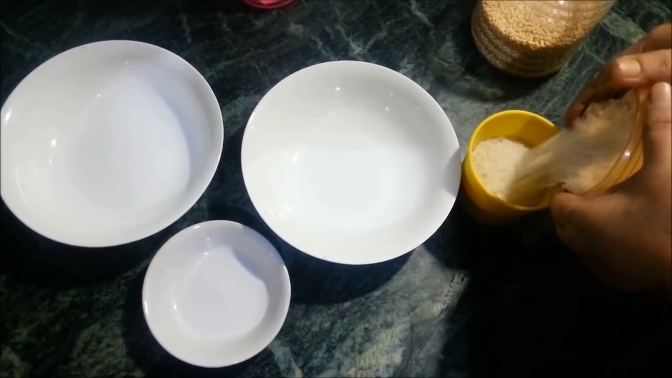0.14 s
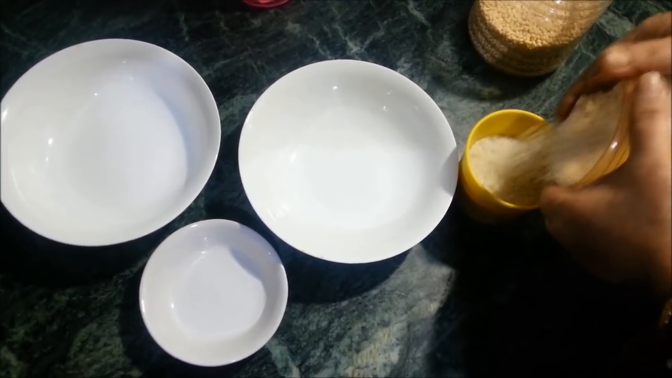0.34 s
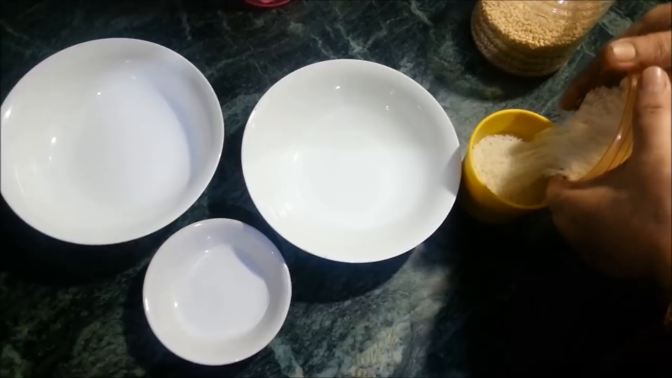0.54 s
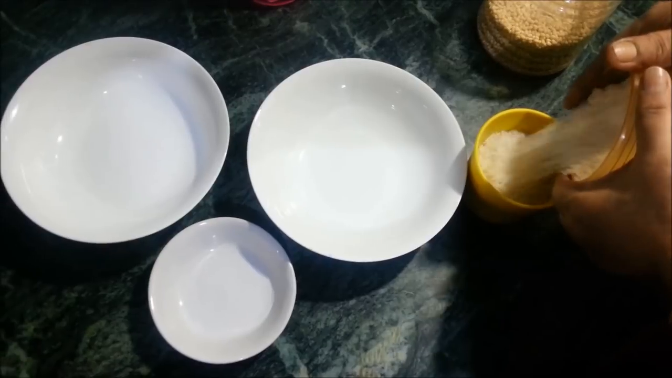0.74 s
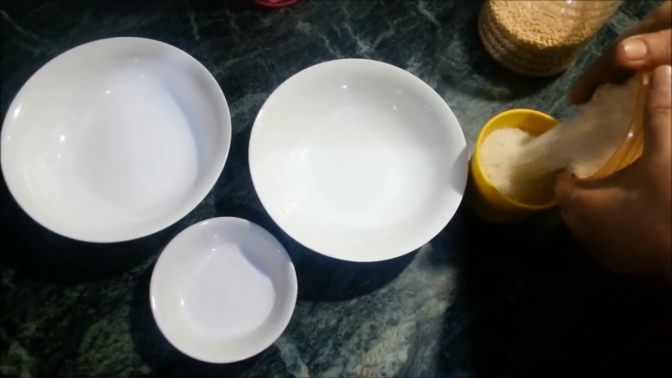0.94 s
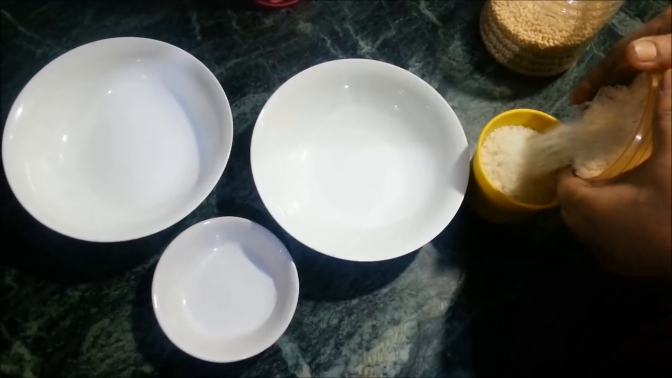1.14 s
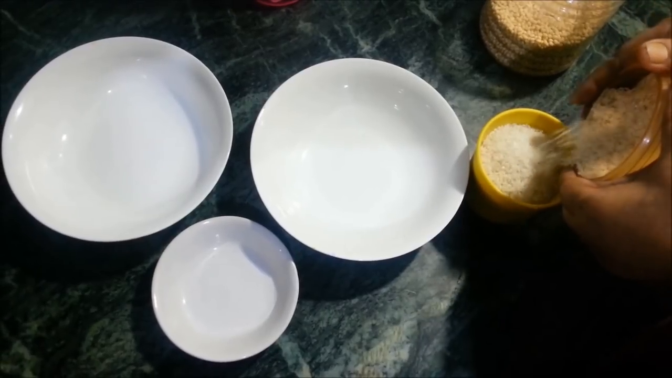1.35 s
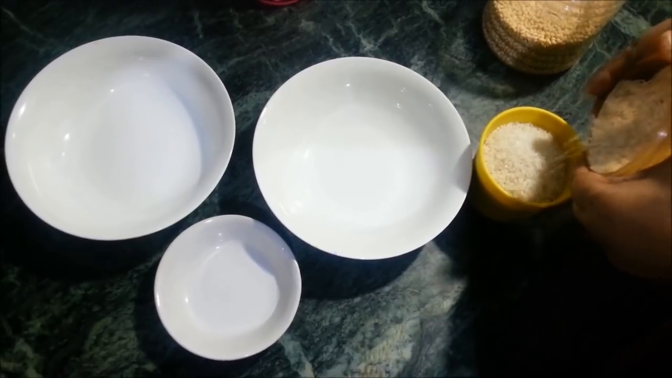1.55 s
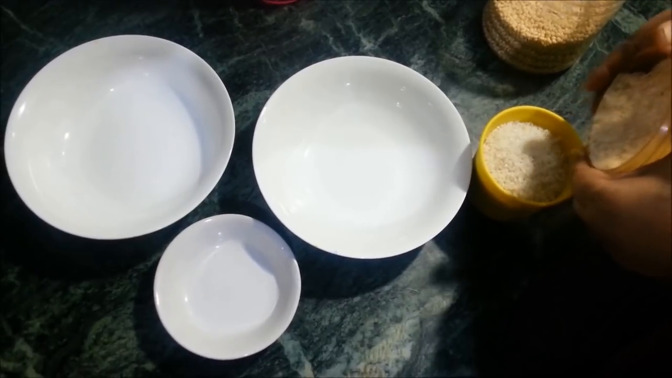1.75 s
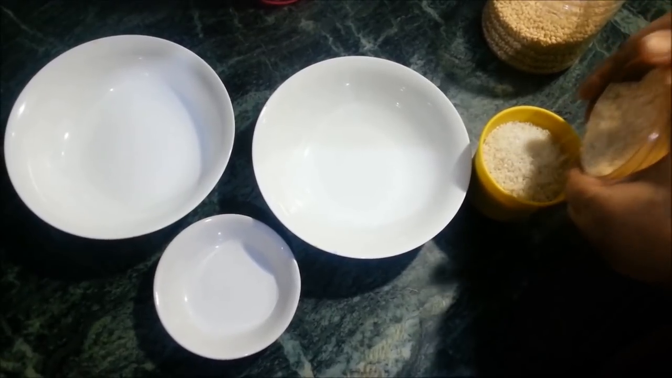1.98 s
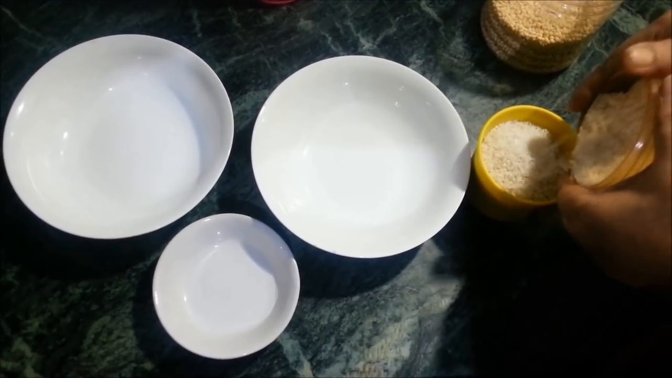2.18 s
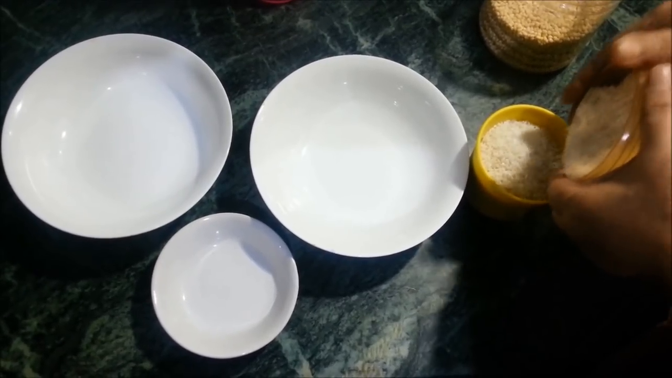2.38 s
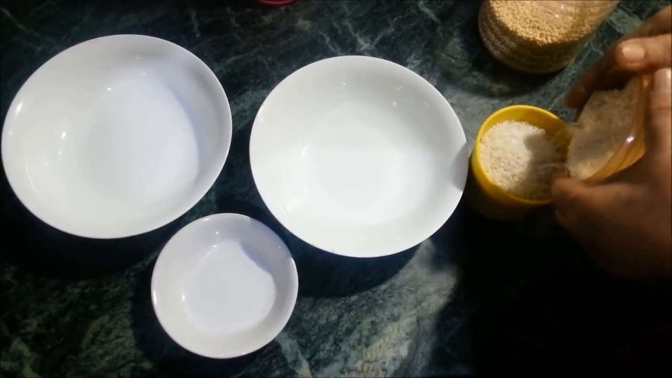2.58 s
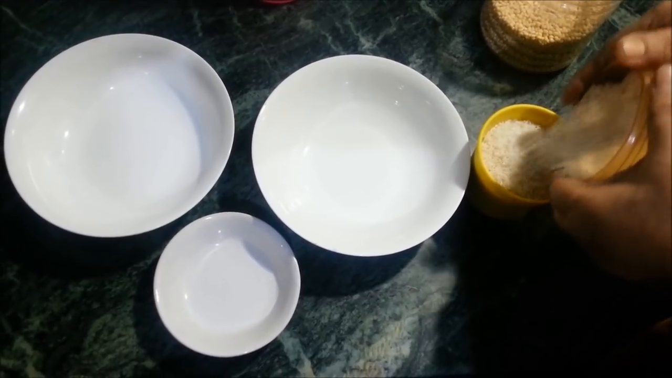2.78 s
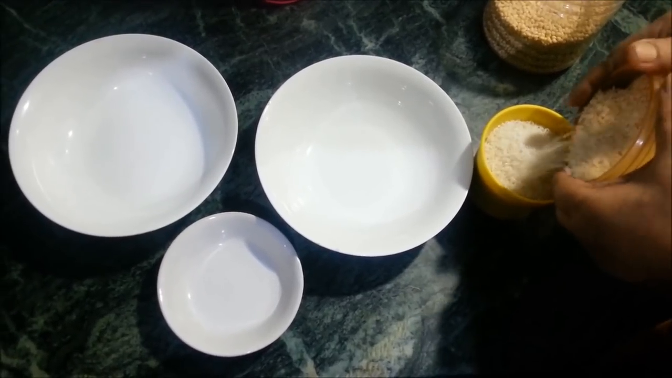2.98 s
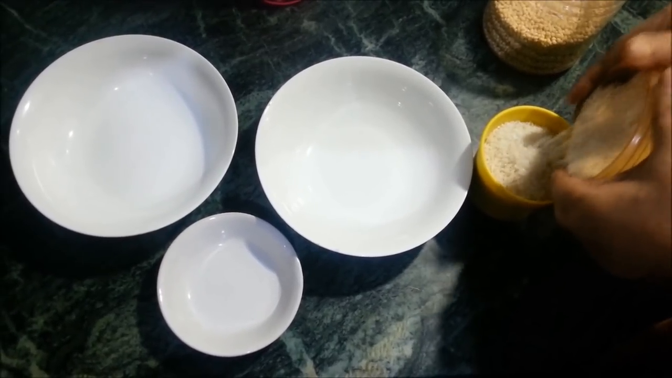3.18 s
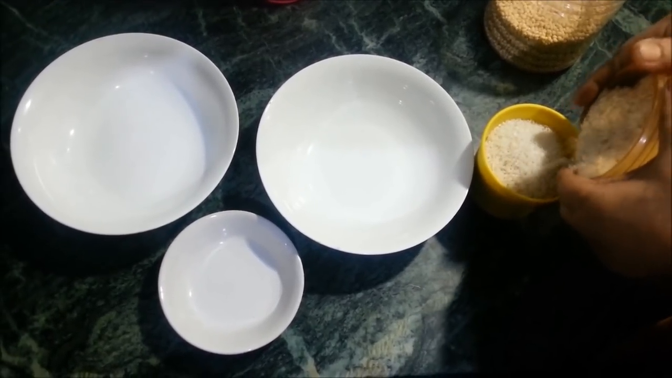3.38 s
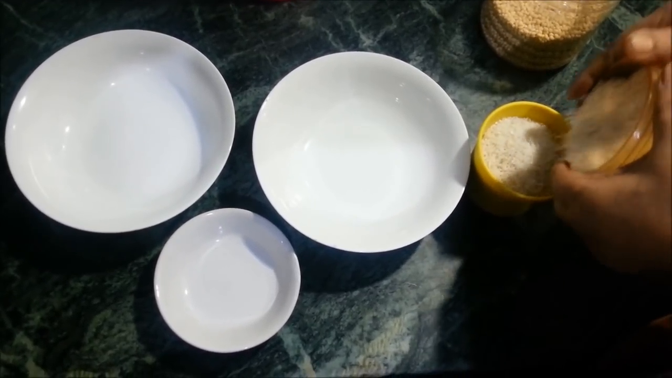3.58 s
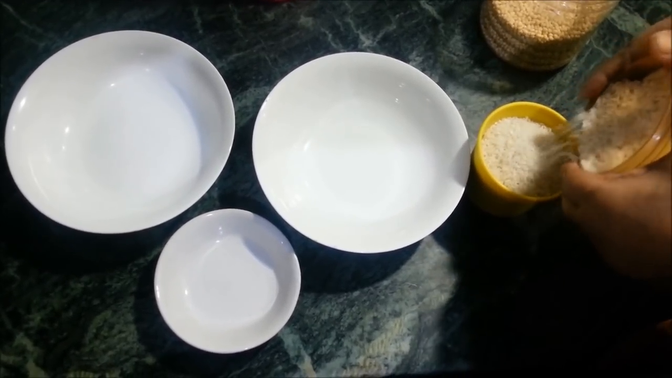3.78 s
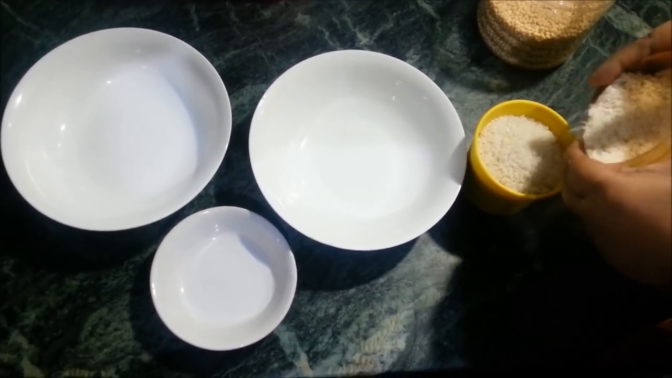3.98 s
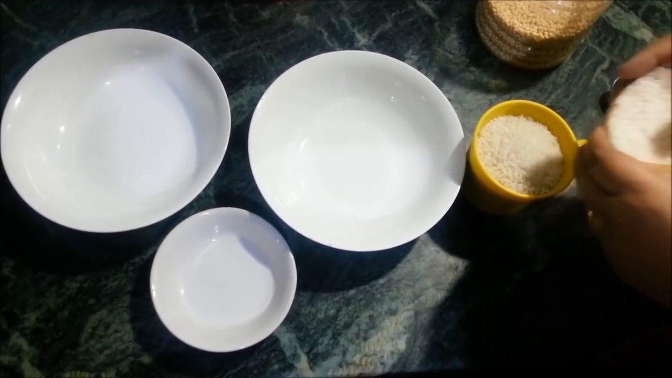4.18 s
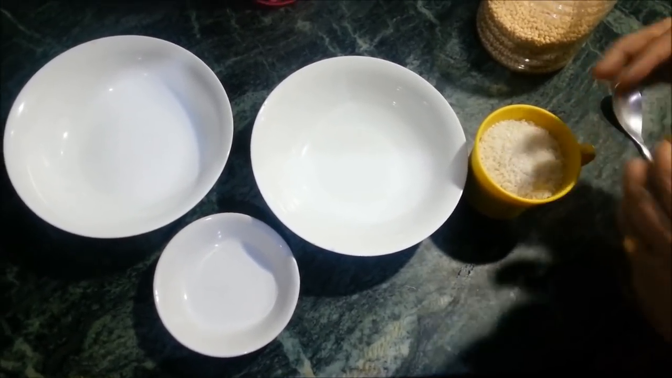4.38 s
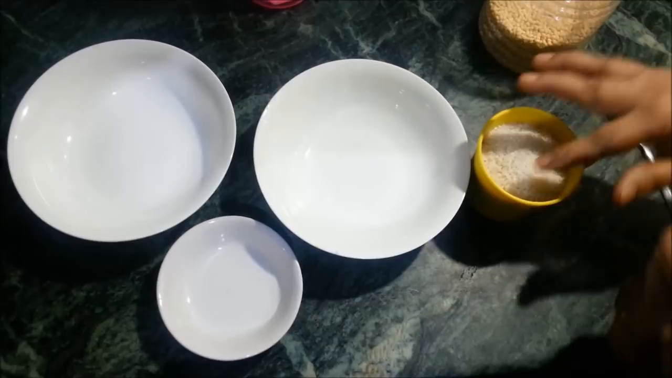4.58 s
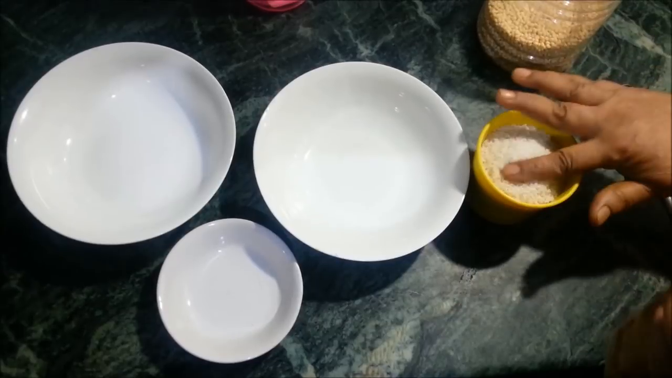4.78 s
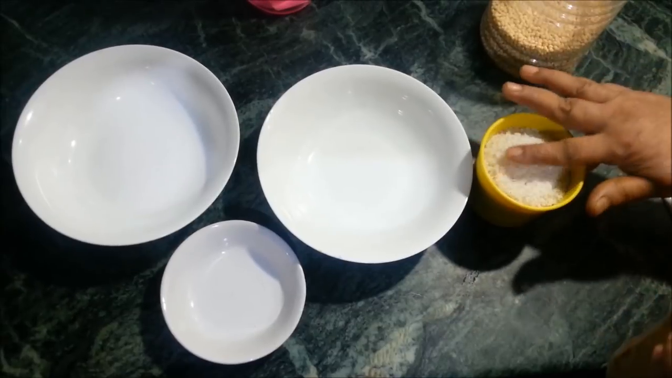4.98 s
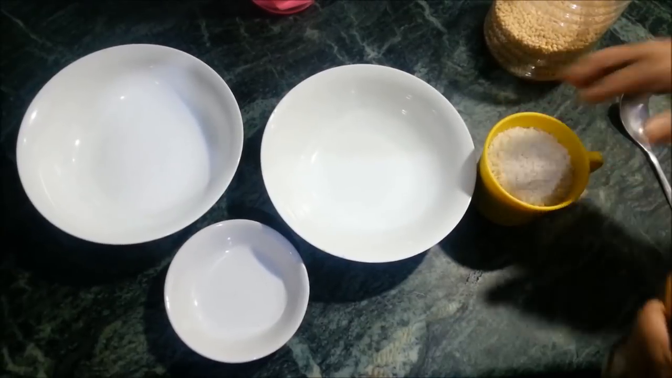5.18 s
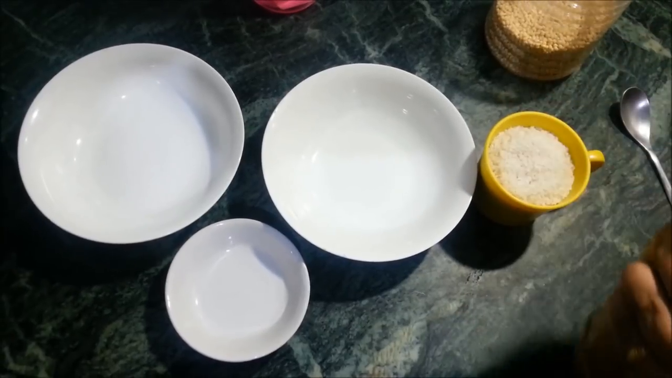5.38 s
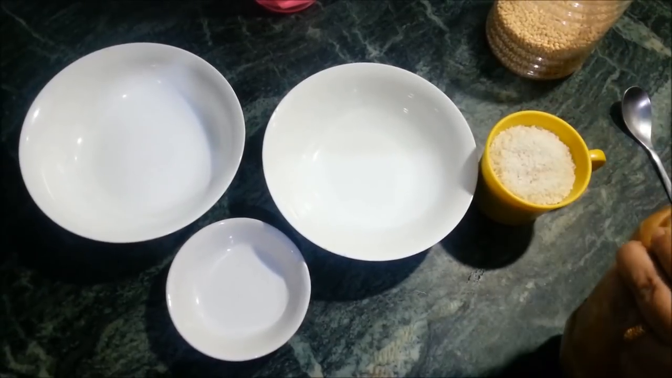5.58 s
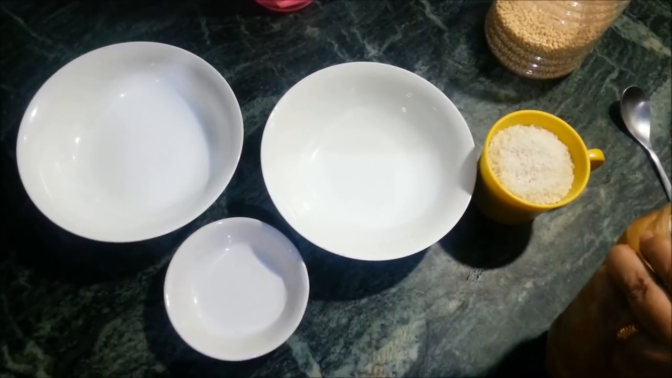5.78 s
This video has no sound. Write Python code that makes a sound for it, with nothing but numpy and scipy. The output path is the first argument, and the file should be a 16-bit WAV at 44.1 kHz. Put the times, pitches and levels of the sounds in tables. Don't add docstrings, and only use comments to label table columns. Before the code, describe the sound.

From the start, dry rice pours from a hand-held plastic jar into a small plastic cup, very close and crisp. The hissing stream pulses several times in the first 0.7 seconds, swells around 0.9, then thins into scattered ticks by 1.7, the bright cup ring dulling as the heap rises. Soft knocks on the jar and sparse grains follow until 2.7. Three loud taps, near 2.8, 3.3 and 3.65, each shake out a sharp crackling burst with rice sliding after it; the second is somewhat weaker. Faint grains and a small knock continue past 4. From about 4.4 to 5.1 a finger levels the heap with a soft dry rustle and damped ticks. Near quiet follows, until rice tumbles dully in the picked-up jar from 5.6 to the end at about 5.8, cut while still moving. A faint, uneven low appliance hum and light air noise lie beneath. Grains sit left of centre; the room is nearly dry.

```python
import sys
import numpy as np
from scipy import signal
from scipy.fft import rfft, irfft
from scipy.io import wavfile
from scipy.ndimage import uniform_filter1d

SR = 44100
rng = np.random.default_rng(int(sys.argv[2]) if len(sys.argv) > 2 else 0)


def persist_wave(psi):
    counts = np.round(np.clip(psi, -1, 1) * 32767).astype(np.int16)
    wavfile.write(sys.argv[1], SR, np.atleast_2d(counts).T)


def volts(x):
    e = np.asarray(x, float) / 20
    return 10 ** e


N = 257544

# time in seconds, hum level in dB.
APPLIANCE_LOAD = [(0.0, -50.5), (0.23, -46.5), (0.47, -58.5), (1.32, -58.5), (1.46, -50), (2.03, -69.5),
                  (2.18, -52), (2.5, -68.5), (2.86, -53), (3.2, -71), (3.27, -55), (3.38, -68), (3.67, -50),
                  (3.95, -68.5), (4.75, -52.5), (5.2, -65), (5.79, -51.5), (5.84, -57.5)]
# frequency in Hz, width in Hz, level in dB.
ROOM_MODES = [(31.5, 14, -21), (60.3, 8.7, -15), (115, 32, -1.5), (154.3, 79, -9.5), (207.8, 15, -1),
              (260, 102, -3.5), (286.2, 16.5, 2.5), (327.7, 17, -7), (454, 27, -28.5)]
# frequency in Hz, density in dB per Hz.
AIR_SPECTRUM = [(260, -65), (450, -17.5), (499, -18), (689, -22), (752, -8), (1070, -14.5), (6890, -26.5),
                (15000, -27.5)]
HUM_HZ, AIR_DB = 95.7, -61.5
DRONE_DB, DRONE_DB_PER_DB = -51.5, 0.22

# start in seconds, peak level in dB.
JAR_KNOCKS = [(1.722, -49), (1.85, -41), (2.13, -29), (2.778, -24), (2.834, -33), (3.269, -85),
              (3.61, -29.5), (3.654, -60), (4.086, -34), (4.429, -45.5)]
# frequency in Hz, width in Hz, level in dB.
JAR_MODES = [(423, 350, 7), (844, 1600, 2), (1390, 500, -11)]

# frequency in Hz, width in Hz, level in dB.
PORT_MODES = [(6730, 2000, 4.5), (5000, 2030, -4)]
# frequency in Hz, width in Hz, level in dB.
CRACK_MODES = [(9470, 3600, -1.5), (12660, 6500, 0.5)]
# frequency in Hz, width in Hz, level in dB.
HEAP_MODES = [(4580, 3000, 1.5), (2783, 2060, -1), (1540, 1240, -3.5), (955, 620, -4)]
# frequency in Hz, width in Hz, level in dB.
CUP_MODES = [(7010, 600, 0.5), (8580, 490, 0)]
# time in seconds, ring of the wall in dB.
CUP_FILLING = [
    (0, 1),
    (1.2, 0),
    (1.9, -17),
    (5.84, -16.5),
]

# time in seconds, rattle level in dB.
STREAM = [(0.0, -38), (.126, -45.5), (.24, -38.5), (.37, -46), (.486, -39.5), (.69, -47), (.89, -38),
          (1.7, -53), (1.88, -75)]
# peak in seconds, rattle level in dB, seconds to rise 20 dB, seconds to fall 20 dB.
HANDFULS = [(2.0, -47.5, 0.04, .05), (2.226, -48.5, 0.1, 0.34), (2.594, -50, .02, .3),
            (2.84, -20, 0.02, .04), (3.0, -39, .12, .25), (3.12, -47.5, 0.33, .2),
            (3.272, -22, 0.0144, 0.0237), (3.47, -50, .3, 0.4), (3.66, -20.5, 0.02, .05),
            (3.9, -48.5, 0.5, 0.31), (4.13, -57.5, 0.3, 0.3), (4.27, -53.5, 0.16, .3),
            (5.15, -59.5, 0.5, 0.08)]
# peak in seconds, rattle level in dB, seconds to rise 20 dB, seconds to fall 20 dB.
NUDGES = [(1.726, -51, 0.14, 0.04), (1.86, -52.5, .06, 0.04), (2.132, -48.5, 0.01, 0.44),
          (2.34, -55, .1, 0.2), (2.44, -47, 0.11, 0.34), (2.782, -40.5, .006, .3), (3.556, -45, 0.06, 0.05),
          (3.614, -39.5, .007, .22), (4.082, -50.5, .012, .07)]
# peak in seconds, rattle level in dB, seconds to rise 20 dB, seconds to fall 20 dB.
SLIDING = [(2.86, -28, .045, 0.12), (3.28, -35.5, 0.031, 0.13), (3.67, -26.5, 0.059, .14),
           (4.39, -48, 0.19, 0.18), (4.444, -39, 0.11, 0.088), (4.73, -38.5, 0.32, 0.35),
           (4.87, -35.5, 0.23, .15), (5.076, -50, 0.04, 0.038), (5.126, -53, 0.027, 0.046),
           (5.194, -60, .04, .03)]
# peak in seconds, rattle level in dB, seconds to rise 20 dB, seconds to fall 20 dB.
TUMBLING = [(5.585, -70, 0.16, .1), (5.624, -37, .015, 0.13), (5.664, -34, 0.057, .1),
            (5.778, -34, 0.085, .3), (5.84, -31.5, 0.13, .2)]
# crack in dB re rattle, heap in dB re rattle,
# left minus right in dB, scatter of grain sizes in dB.
MOTION_COLOURS = [
    (0, -8.5, 5, 2.5),
    (-1.5, -8, 5, 2.5),
    (-9, 1.5, 5, 2.2),
    (-10, -2.5, 7.5, 2),
    (-12, -5, 6.5, 2),
]

# start in seconds, peak level in dB, crack in dB re peak, left minus right in dB.
GRAIN_TICKS = [(0.0468, -21.5, -14.5, 9.5), (0.0772, -24, -15, 8.0), (0.1491, -28, -14, 7.0),
               (0.167, -24, -13, 8), (0.2357, -19, -17, 8), (0.301, -24, -16, 7.5),
               (0.4222, -25.5, -14, 7.5), (0.4665, -22, -13, 6), (0.5144, -25, -13, 6.5),
               (0.545, -26, -16, 6.0), (0.5644, -22, -17, 5.0), (0.624, -24.5, -14, 6),
               (0.655, -19.5, -18, 6.5), (0.7355, -25.5, -20, 6.5), (0.838, -24, -15, 7.0),
               (0.8982, -24.5, -14, 7), (1.0874, -26, -17, 5), (1.137, -27, -11, 5),
               (1.1987, -27, -10, 7.5), (1.3059, -31.5, -7, 6.0), (1.33, -28, -9, 3),
               (1.3648, -28, -15, 5.5), (1.4117, -32.5, -6, 5), (1.4376, -28, -10, 7.5),
               (1.4974, -32, -7, 4.5), (1.5392, -31.5, -10, 6.0), (1.6096, -37.5, -7, 5.0),
               (1.6447, -36, -7.5, 4.5), (1.6945, -37, -4.5, 3.5), (1.7247, -32, -21, 6),
               (1.7739, -39, -14, 3.0), (1.8243, -40.5, -12, 3.5), (1.9694, -42.5, -9, 3.5),
                (2.0004, -30.5, -20, 5.0), (2.1096, -46, -17, 1.5), (2.1281, -35, -23, 1.5),
                (2.218, -34, -10, 4.5), (2.2633, -31.5, -17, 3.5), (2.3545, -31, -17, 3.5),
                (2.3991, -34.5, -4, 4.5), (2.441, -31, -19, 5.0), (2.5888, -31, -8, 7.5),
                (2.6244, -36, -7, 5.0), (2.6626, -35, -5, 3.5), (2.7312, -34, -17, 4.0),
                (2.834, -9.5, -18, 3.5), (2.8374, -10.5, -17, 4.5), (2.8414, -10, -19, 4.5),
                (2.8474, -7, -17, 5.5), (2.8648, -20, -23, 3.5), (2.9864, -25.5, -8, 4.0),
                (3.0022, -23, -7, 4.8), (3.1574, -36, -7, 5.5), (3.262, -17.5, -16, 6.5),
                (3.2705, -15, -16, 5.5), (3.4989, -34, -10, 3.0), (3.5443, -34, -9, 2.0),
                (3.5563, -27, -22, 4.5),
               (3.6496, -10.5, -17, 6.5), (3.6644, -6.5, -14, 3.0), (3.6887, -12, -24, 6.0),
              (3.7004, -15.5, -22, 3.5), (3.88, -37, -4, 6.0), (3.9185, -35, -14, 4.0),
              (3.9724, -39, -12, 4.5), (4.0048, -37, -14, 5.0), (4.0781, -36, -18, 4.0),
              (4.1325, -43, -10.5, 4.5), (4.2587, -38.5, -7, 4.0), (4.2802, -34, -20, 3.5),
              (4.359, -31, -16, 5.0), (4.4134, -29, -21, 2.5), (4.6099, -30, -20, 4.0),
              (4.7137, -26, -25, 6.0), (4.8302, -22.5, -27, 7.5), (4.909, -22, -32, 9.1),
              (4.9496, -27.5, -23, 7.5), (5.0418, -30.5, -26, 6.0), (5.0663, -33, -26, 9.5),
              (5.1248, -36, -21, 5.7), (5.619, -23, -20.5, 5.5), (5.656, -21, -21, 4.5),
              (5.7379, -21.5, -25, 4.5), (5.7695, -19, -24, 7.5)]

GRAINS, PLACES = 16000, 4
LAG_S, BOUNCE_S = .0002, .0014
STILL_DB = -80
ONSET_BEND = 1.42
HEAP_DB_PER_DB, USUAL_DB = -0.2587, -45
DENSE_DB, MUFFLE_DB_PER_DB = -34, .2
TICK_DB, TICK_CRACK_DB, TICK_HEAP_DB = 15, 9, -16.5
TOP_HZ = 14330


def unit(x):
    return x / np.sqrt(np.mean(x ** 2))


def curve(table, s):
    at, *columns = np.transpose(table)
    return [np.interp(s, at, column) for column in columns]


def ring(x, modes, order=1):
    def bank(v):
        for _ in range(order):
            total = 0
            for hz, width, db in modes:
                b, a = signal.iirpeak(min(hz, .45 * SR), hz / width, fs=SR)
                total = total + volts(db) * signal.lfilter(b, a, v)
            v = total
        return v
    impulse_energy = np.sum(bank(signal.unit_impulse(SR)) ** 2)
    return bank(x) / np.sqrt(impulse_energy)


def pair(alike):
    mid, side = rng.standard_normal((2, N))
    alike = np.clip(alike, 0, 1)
    return np.sqrt(1 + alike) * mid + np.sqrt(1 - alike) * side * np.array([[1], [-1]])


def kitchen(right_db=2.5, wobble_hz=0.71, drone_top_hz=650):
    t = np.arange(N) / SR
    hum_db, = curve(APPLIANCE_LOAD, t)
    slow = uniform_filter1d(rng.standard_normal(N), SR // 16)
    swell = unit(uniform_filter1d(slow, SR // 16))
    drone_db = DRONE_DB + DRONE_DB_PER_DB * (hum_db + 54.5) + 2.2 * swell

    drift = unit(uniform_filter1d(rng.standard_normal(N), SR // 8))
    phase = 2 * np.pi * np.cumsum(HUM_HZ + wobble_hz * drift) / SR
    hum = np.sqrt(2) * volts(hum_db) * np.sin(phase)

    low_pass = signal.butter(2, drone_top_hz, fs=SR, output="sos")
    rumble = signal.sosfilt(low_pass, pair(0.77))
    balance = volts(np.array([[-right_db], [right_db]]) / 2)
    drone = volts(drone_db + 3.0) * unit(ring(rumble, ROOM_MODES)) * balance

    hz, db = np.transpose(AIR_SPECTRUM)
    bins_hz = np.fft.rfftfreq(N, 1 / SR)
    shape = volts(np.interp(np.log(bins_hz + 1), np.log(hz), db))
    air = unit(irfft(rfft(pair(0.13)) * shape, N))
    air_db = AIR_DB + 2.0 + .3 * (drone_db - drone_db.mean())
    return hum + drone + volts(air_db) * air


def knocks(thud_s=0.011, gain_db=-14.5):
    t = np.arange(SR // 10) / SR
    pushes = np.zeros((2, N))
    for s, db in JAR_KNOCKS:
        i = int(s * SR)
        push = rng.standard_normal((2, len(t))) * np.exp(-t / thud_s)
        pushes[:, i:i + len(t)] += volts(db + gain_db) * push[:, :N - i]
    return ring(pushes, JAR_MODES)


def bursts(rows, s):
    at, db, rise_s, fall_s = np.transpose(rows)[:, :, None]
    rise = (np.abs(at - s) / rise_s) ** ONSET_BEND
    fall = (s - at) / fall_s
    level_db = db - 20 * np.where(s < at, rise, fall)
    return np.sum(volts(level_db) ** 2, axis=0)


def motion(s):
    stream_db, = curve(STREAM, s)
    stream = volts(stream_db) ** 2 * (s < STREAM[-1][0]) + volts(STILL_DB) ** 2
    moves = [bursts(rows, s) for rows in (HANDFULS, NUDGES, SLIDING, TUMBLING)]
    power = np.array([stream, *moves])
    total = power.sum(axis=0)
    rattle_db = 10 * np.log10(total)
    crack_db, heap_db, pan_db, scatter_db = np.transpose(MOTION_COLOURS) @ (power / total)
    muffle_db = MUFFLE_DB_PER_DB * np.maximum(rattle_db - DENSE_DB, 0)
    heap_db = heap_db + muffle_db + HEAP_DB_PER_DB * (rattle_db - USUAL_DB)
    return rattle_db, crack_db - muffle_db, heap_db, pan_db, scatter_db


def strike(s, size, place):
    out = np.zeros((PLACES, N + 2))
    at = np.clip(s * SR, 0, N)
    i = at.astype(int)
    np.add.at(out, (place, i), size * (1 - (at - i)))
    np.add.at(out, (place, i + 1), size * (at - i))
    return out[:, :N]


def echoes(bounce_db=-13, room_s=0.029, room_db=-27):
    t = np.arange(SR // 8) / SR
    tail = volts(bounce_db) * np.exp(-t / BOUNCE_S) + volts(room_db) * np.exp(-t / room_s)
    response = tail * rng.standard_normal((PLACES, len(t)))
    response[:, 0] = 1
    return response / np.sqrt(np.sum(response ** 2, axis=1, keepdims=True))


def stream_grains(stream_db=-1.67):
    when, chance, _ = rng.random((GRAINS, 3)).T
    s = when * N / SR
    rattle_db, crack_db, heap_db, pan_db, scatter_db = motion(s)
    scatter_db = np.clip(scatter_db, 0, 4)
    size_db = scatter_db * np.minimum(-np.log(chance + 1e-9), 4)
    size_db += 10 * np.log10(1.5 - scatter_db * np.log(10) / 10)
    size_db += stream_db + 10 * np.log10(N / GRAINS)
    return np.array([s, rattle_db + size_db, crack_db, heap_db, pan_db])


def single_grains():
    rows = np.array(GRAIN_TICKS)
    at, db, crack_db, pan_db = np.transpose(rows)
    heap_db = np.full(len(at), TICK_HEAP_DB)
    return np.array([at, db + TICK_DB, crack_db + TICK_CRACK_DB, heap_db, pan_db])


def rice(colour_db=4.0, lag_spread_s=.00006, crack_gain_db=1.0):
    grains = np.concatenate([stream_grains(), single_grains()], axis=1)
    s, db, crack_db, heap_db, pan_db = grains
    wall_db, = curve(CUP_FILLING, s)
    luck = rng.standard_normal((len(s), 6)).T
    luck[:4, GRAINS:] = [[.1], [-.1], [.1], [.1]]
    place = np.arange(len(s)) % PLACES
    lag = LAG_S + lag_spread_s * luck[5]
    ports = []
    for side in (1, -1):
        size = np.sign(luck[4]) * volts(db + side * pan_db / 2)
        bodies = [(PORT_MODES, 0),
                  (CRACK_MODES, crack_db + crack_gain_db),
                  (HEAP_MODES, heap_db - side * pan_db / 2),
                  (CUP_MODES, crack_db + wall_db)]
        dry = 0
        for (modes, rel_db), colour in zip(bodies, luck):
            blow = np.sign(colour) * size * volts(rel_db + colour_db * colour)
            dry = dry + ring(strike(s + side * lag / 2, blow, place), modes, order=2)
        wet = signal.fftconvolve(dry, echoes(), axes=1)[:, :N]
        ports.append(wet.sum(axis=0))
    return np.array(ports)


def scene():
    return kitchen() + knocks() + rice()


def top_cut(x):
    return signal.sosfilt(signal.butter(12, 15600, fs=SR, output="sos"), x)


def record(dry):
    low_pass = signal.ellip(7, .3, 46, TOP_HZ, fs=SR, output="sos")
    mix = signal.sosfilt(low_pass, np.tanh(dry))
    return top_cut(mix)


dry = scene()
out = record(dry)
persist_wave(out)
```